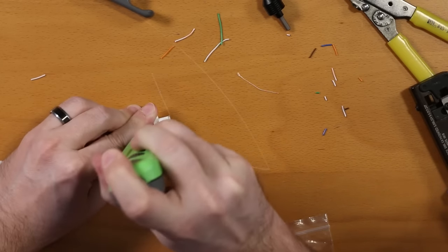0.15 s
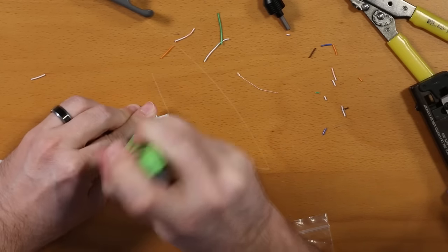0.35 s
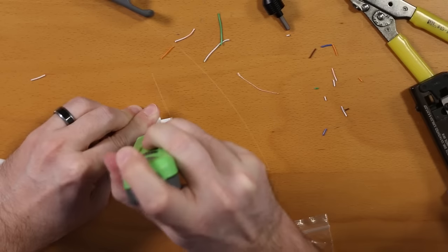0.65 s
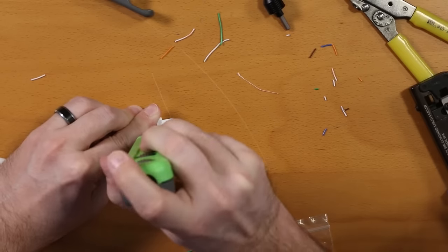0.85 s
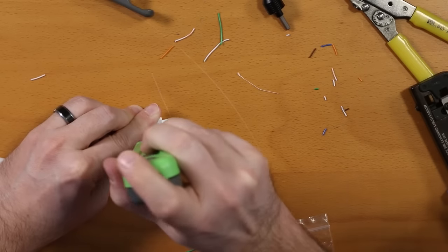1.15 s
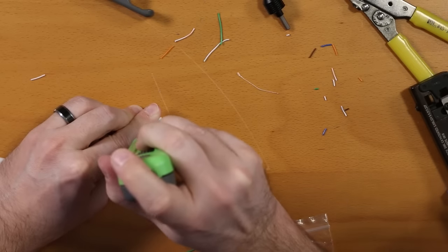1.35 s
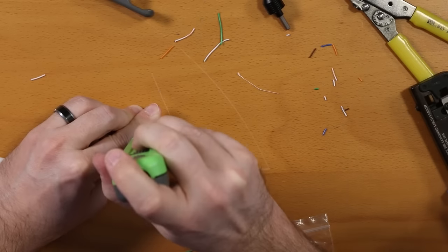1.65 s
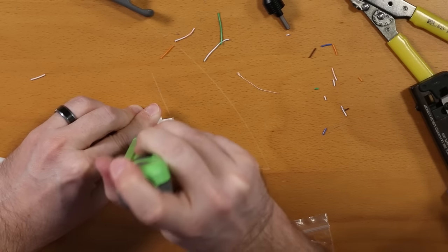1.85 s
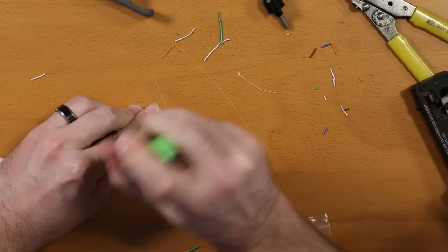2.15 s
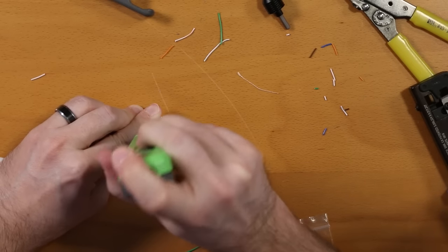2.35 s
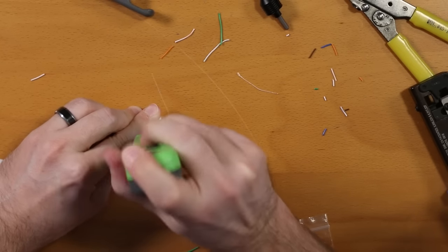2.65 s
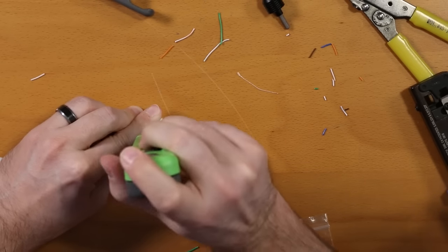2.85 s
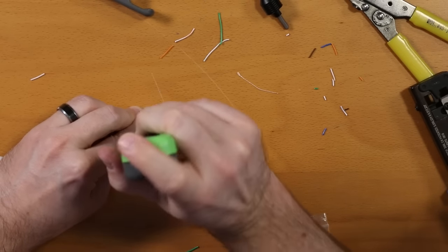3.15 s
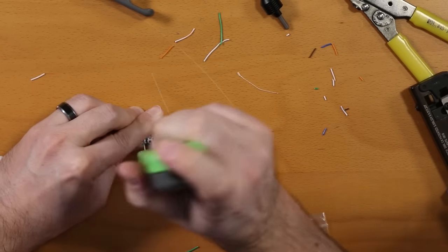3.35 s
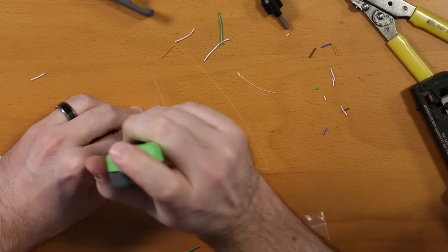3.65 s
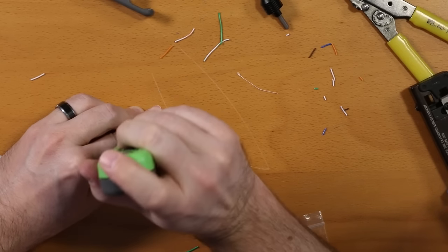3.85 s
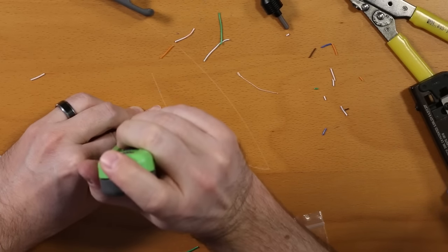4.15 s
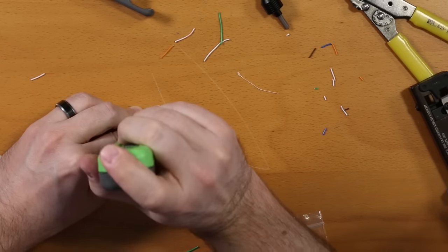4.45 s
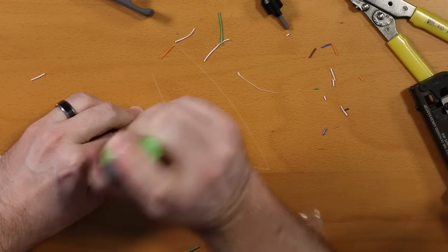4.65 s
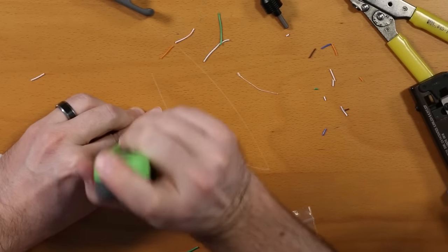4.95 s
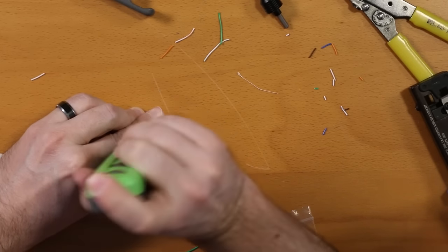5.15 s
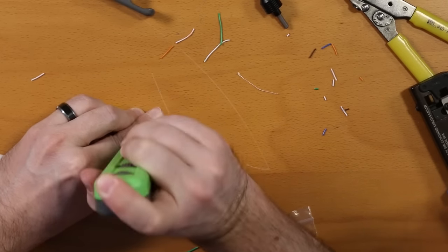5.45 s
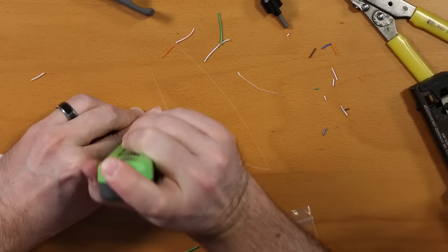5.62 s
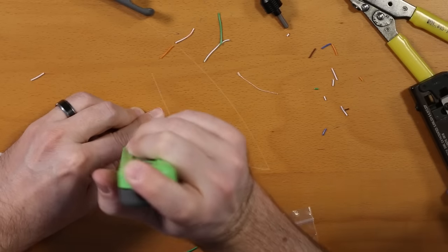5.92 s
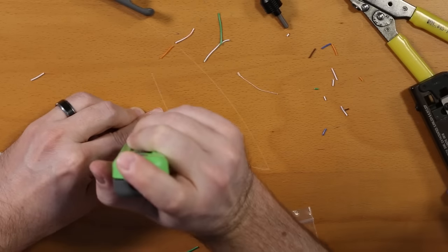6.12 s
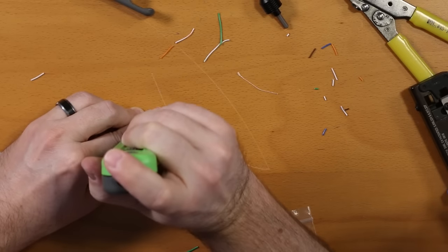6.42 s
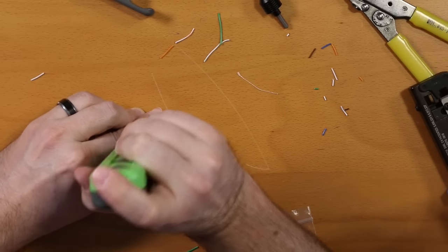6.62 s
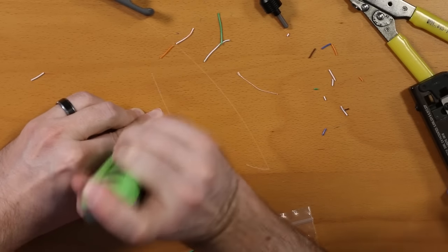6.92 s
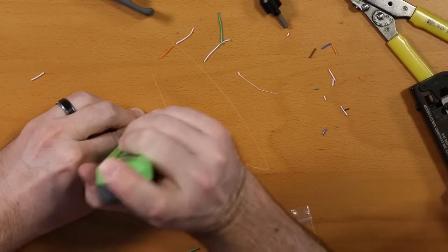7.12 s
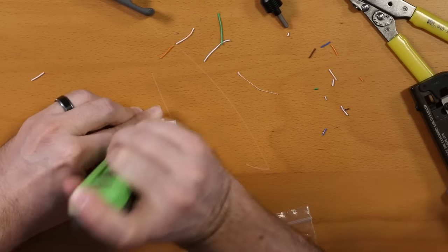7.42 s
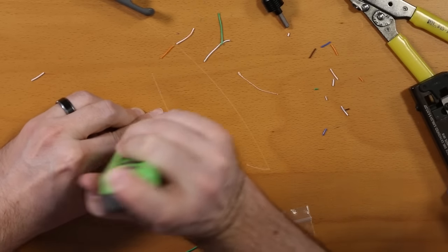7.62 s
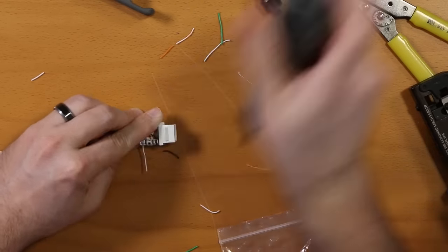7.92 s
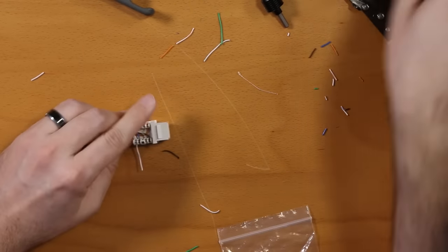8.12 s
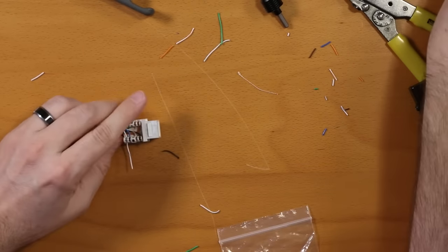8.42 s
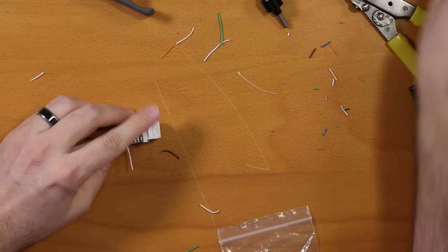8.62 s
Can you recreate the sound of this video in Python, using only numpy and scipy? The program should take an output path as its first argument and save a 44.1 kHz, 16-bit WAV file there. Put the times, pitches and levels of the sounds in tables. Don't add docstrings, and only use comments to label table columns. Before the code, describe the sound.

Faint hiss and distant ventilation lie under close handling sounds: skin scuffing wood, a blade ticking on plastic and wire. Seven explosive metallic snaps punch through, distorted at the peak, each with a bench thump, short room reverberation and a low lingering hum from the bench frame. A smaller latch click answers each one. After the last, near silence, then the tool clunks down and rocks once.

```python
import sys
import numpy as np
from scipy import signal
from scipy.fft import rfft, irfft
from scipy.io import wavfile

SR = 44100
rng = np.random.default_rng(int(sys.argv[2]) if len(sys.argv) > 2 else 0)


def linear_from_db(decibels):
    return 10 ** (np.asarray(decibels, float) / 20)


def int16_out(signal):
    q = np.round(np.clip(np.atleast_2d(signal).T, -1, 1) * 32767)
    wavfile.write(sys.argv[1], SR, q.astype(np.int16))


N = 387198


def rms_one(x):
    return x / np.sqrt(np.mean(x ** 2) + 1e-20)


def at_hz(points, hz):
    table = np.array(points)
    return np.interp(np.log(hz), np.log(table[:, 0]), table[:, 1])


def causal_colour(spectrum, size=1024):
    hz = np.maximum(np.arange(size + 1) * SR / (2 * size), 10)
    cepstrum = irfft(np.log(linear_from_db(at_hz(spectrum, hz))))
    cepstrum[1:size] *= 2
    cepstrum[size + 1:] = 0
    return rms_one(irfft(np.exp(rfft(cepstrum)))[:size]) / np.sqrt(size)


def resonance(x, hz, width_hz):
    r = np.exp(-np.pi * width_hz / SR)
    poles = [1, -2 * r * np.cos(2 * np.pi * hz / SR), r * r]
    return signal.lfilter((1 - r * r) / 2 * np.array([1, 0, -1]), poles, x)


def band(x, low_hz, high_hz):
    return signal.sosfilt(signal.butter(2, [low_hz, high_hz], "band", fs=SR, output="sos"), x)


def spread(mid, side, likeness):
    alike = np.clip(likeness, 0, 1)
    return np.sqrt(1 + alike) * mid + np.sqrt(1 - alike) * side * np.array([[1], [-1]])


def pair(likeness):
    mid, side = rng.standard_normal((2, N))
    return spread(mid, side, likeness) / np.sqrt(2)


def panned(db):
    return linear_from_db(np.array([[db / 2], [-db / 2]]))


# (frequency [Hz], level [dB per Hz])
AIR_COLOUR = [(60, -25), (95, -25.5), (125, -33), (220, -37.5), (265, -23), (350, -42), (450, -43.5),
              (560, -40.5), (800, -39.5), (1800, -48), (2600, -55), (5000, -59.5), (9000, -68),
              (15800, -71.5)]
# (frequency [Hz], width [Hz], level [dB])
DUCT_TONES = [(131, 8, -63), (262, 130, -59.5), (307, 13, -66), (447, 29, -70), (740, 130, -67.5)]


def air():
    steady_db, linger_db, linger_t60_s, swell_s = -54, -30, 0.82, 0.067
    noise = rms_one(signal.fftconvolve(pair(0.31), causal_colour(AIR_COLOUR, size=2048)[None])[:, :N])
    tones = sum(linear_from_db(db) * rms_one(resonance(pair(0.086), hz, width_hz)) for hz, width_hz, db in DUCT_TONES)
    since = np.arange(N) / SR - np.array(BLOWS)[:, :1]
    decay = linear_from_db(linger_db - 60 * np.abs(since) / linger_t60_s)
    linger = np.sum(np.clip(since / swell_s, 0, 1) * decay, axis=0)
    return panned(2.0) * ((linear_from_db(steady_db) + linger) * noise + tones)


def tremor():
    return panned(3.0) * linear_from_db(-52.5) * rms_one(band(pair(.2), 50, 90.9))


def watch():
    first_s, period_s, count = 2.882, .1945, 5
    hz, t60_s, db = 9100, .15, -76
    beats = np.full(N, 1e-18)
    beats[((first_s + period_s * np.arange(count)) * SR).astype(int)] = linear_from_db(db)
    r, w = linear_from_db(-60 / (t60_s * SR)), 2 * np.pi * hz / SR
    return signal.lfilter([0, np.sin(w)], [1, -2 * r * np.cos(w), r * r], beats)


# (frequency [Hz], level [dB], t60 [s], left-right difference [dB], first swing [+1 up, -1 down])
SWAY_MODES = [(25.86, -21, 0.88, 6, 1), (26.84, -35.5, 2.4, 2, -1), (42.7, -24, 1.2, 3, 1),
              (115, -51.5, 6, 2, 1), (264, -34, 0.6, 3.5, 1), (431, -42.5, 2, -3, -1)]
FRAME_MODES = [(58.86, -37.5, 6.6, -2, -1), (64.93, -37.5, 4.5, 3, 1), (74.07, -37, 10.4, 4, -1),
               (75.91, -38, 21.5, 4, -1), (89.7, -52, 6, 3, -1)]
# (time [s], level [dB])
JOLTS = [(-1.5271, 6), (-.3098, 0), (.1848, -4), (1.7593, 0), (2.2785, -4), (2.977, -18), (3.514, -22),
         (4.237, -19), (4.423, -16), (4.527, 0), (5.2247, 0), (6.638, 0), (7.1607, -2.5), (8.3685, -12)]


def frame():
    travel_s = .0035
    t, out = np.arange(N) / SR, np.zeros((2, N))
    for hz, db, t60, pan_db, sign in [*SWAY_MODES, *FRAME_MODES]:
        pole, swing = 2j * np.pi * hz - np.log(1000) / t60, np.zeros(N, complex)
        for s, jolt_db in JOLTS:
            at = max(round((s + travel_s) * SR), 0)
            swing[at] += linear_from_db(jolt_db) * np.exp(pole * (t[at] - s - travel_s))
        swing = signal.lfilter([1], [1, -np.exp(pole / SR)], swing)
        turn = -.9 if hz < 30 else .45 if hz < 50 else .25
        twist = turn * np.array([[-1j], [1j]])
        out += np.sign(sign) * linear_from_db(db) * panned(pan_db) * np.imag(np.exp(twist) * swing)
    return out * np.clip(t / .004, 0, 1)


# (frequency [Hz], t60 [s])
ROOM_T60 = [(150, 0.77), (500, 0.41), (1500, 0.4), (4000, 0.36), (8000, 0.35), (11000, .3), (15000, 0.18)]
# (frequency [Hz], left-right likeness [0..1])
ROOM_LIKENESS = [(150, 0.95), (300, 0.93), (700, 0.74), (2000, 0.82), (5000, 0.36), (8000, 0.97),
                 (13000, .45)]
# (frequency [Hz], left-right difference [dB])
ROOM_BALANCE = [(60, 4.5), (120, 5.5), (240, 1.5), (480, 2.5), (950, 0), (1890, 0.5), (3770, 0.5),
                (7520, 0.5), (15000, 1.5)]


def room(x, early_db, early_t60, late_db):
    t, edges, response = np.arange(SR) / SR, 90 * 2 ** np.arange(0, 8, .5), 0
    white = rng.standard_normal((2, 2, SR))
    for k, (low, high) in enumerate(zip(edges, edges[1:])):
        mid, side = band(white[k % 2], low, high)
        hz = np.sqrt(low * high)
        late = linear_from_db(late_db - 60 * t / at_hz(ROOM_T60, hz))
        early = linear_from_db(early_db - 60 * t / early_t60 * (3.0 + hz / 30000))
        field = spread(mid, side, at_hz(ROOM_LIKENESS, hz))
        response = response + (late + early) * panned(at_hz(ROOM_BALANCE, hz)) * field
    response = response * np.clip((t - .002) / 0.0051, 0, 1)
    return signal.fftconvolve(x.mean(axis=0, keepdims=True), response)[:, :N]


# (time [s],
# length [s], centre [Hz], level [dB])
SCUFFS = [(0, .12, 5200, -57), (0, .1, 2300, -56), (.69, .19, 760, -53), (.72, .13, 1600, -55),
          (1.165, .015, 2900, -62), (1.53, .09, 1100, -46), (4.40, .08, 500, -57), (4.48, .03, 3500, -63),
          (3.85, .05, 1700, -58), (6.36, .04, 1700, -55), (6.045, .1, 700, -52), (7.818, .08, 4350, -66),
          (8.695, .04, 1200, -53), (8.695, .05, 2100, -60)]


def scuffs():
    slide_s, slide_hz, slide_db = 0.03, 3000, -48
    slides = [(s - slide_s, slide_s, slide_hz, slide_db) for s, *_ in LATCHES]
    out = np.zeros((2, N))
    for s, length_s, hz, db in [*SCUFFS, *slides]:
        at = round(s * SR)
        count = min(round(length_s * SR), N - at)
        grit = rng.standard_normal((2, SR // 4)) * rng.exponential(1, SR // 4)
        rub = resonance(resonance(grit + grit[::-1] * 0.67, hz, 0.43 * hz), hz, 0.5 * hz)
        stroke = np.sin(np.linspace(0, 1, count) ** .5 * np.pi)
        out[:, at:at + count] += linear_from_db(db) * rms_one(rub)[:, :count] * stroke
    return panned(1.5) * out


# (frequency [Hz], level [dB], t60 [s])
STEEL = [(2160, -7, .045), (4600, -5, 0.023), (4970, 1, 0.023), (5120, -3.5, 0.017), (6363, -4.5, 0.016),
         (6500, -5, 0.026), (7260, -1.5, 0.023), (10200, -5, .022), (11200, -8, .015), (14220, -7, .015)]


def cracks(events, colour, rattle_s, fade_s, breadth, patchy_db, pan_db, ring_db, steel_db, level_db):
    out, body, t = np.zeros(N + 2048), causal_colour(colour), np.arange(2048) / SR
    bins, fine, coarse = np.arange(96), np.linspace(0, 95, 1025), np.linspace(0, 31, 1025)
    for (s, db, _, _, hz), draw in zip(events, rng.random((len(events), 4, 96))):
        delay_s = rattle_s * draw[0] - fade_s * np.log(np.clip(draw[1], 1e-3, 1))
        phase = np.cumsum(np.interp(fine, bins, delay_s)) * 2 * np.pi * SR / 2048
        patches = linear_from_db(patchy_db * np.interp(coarse, bins, 2 * draw[2] - 1))
        chatter = irfft(patches * np.exp(-1j * phase)) * np.sqrt(SR * (rattle_s + fade_s)) * (t < .03)
        width_hz = breadth * hz
        ring = resonance(resonance(chatter, hz, width_hz), hz, 2 * width_hz) * np.sqrt(SR / (np.pi * width_hz))
        steel = 0
        for (mode_hz, mode_db, t60), chance in zip(STEEL, draw[3]):
            decay = linear_from_db(mode_db + steel_db - 1.3 * patchy_db * chance - 60 * t / t60)
            steel = steel + decay * np.sin(2 * np.pi * mode_hz * t)
        at = round((s - 6e-4) * SR)
        burst = np.convolve(chatter, body)[:2048] + linear_from_db(ring_db) * ring + steel
        out[at:at + 2048] += linear_from_db(db + level_db) * burst
    return panned(pan_db) * np.array([0.54 * out + 0.66 * np.roll(out, 1), out])[:, :N]


def thumps(events, modes, contact_s, lead_s, spread_db, level_db):
    at = np.array([round((event[0] - lead_s) * SR) for event in events])
    click_db, over_db, deep_db = np.array([event[1:4] for event in events]).T
    chance, out = rng.standard_normal((len(events), len(modes))), np.zeros((2, 2, N))
    for k, (hz, db, t60) in enumerate(modes):
        push = np.full(N, 1e-18)
        thump_db = deep_db + 3 if hz < 190 else over_db
        late = round(.65 / hz * SR)
        push[at + late] = -linear_from_db(click_db + thump_db + db + level_db + spread_db * chance[:, k])
        r, w = linear_from_db(-60 / (t60 * SR)), 2 * np.pi * hz / SR
        poles = [1, -2 * r * np.cos(w), r * r]
        sine = signal.lfilter([0, r * np.sin(w)], poles, push)
        cosine = signal.lfilter([1, -r * np.cos(w)], poles, push)
        twist = min(140 / hz, .6) * np.cos(2.9 * k + .3)
        side_db = at_hz(ROOM_BALANCE, hz) + 1.2 * np.cos(0.92 * k)
        out[int(hz < 50)] += panned(side_db) * (np.cos(twist) * sine + np.sin(twist) * cosine * [[1], [-1]])
    free = signal.butter(2, 95, "high", fs=SR, output="sos")
    out = signal.sosfilt(free, out[0]) + out[1]
    soft = np.exp(-1 / (contact_s * SR))
    return signal.lfilter([(1 - soft) ** 2], [1, -2 * soft, soft * soft], out)


def knocks(events, low_hz, high_hz, level_db):
    push = np.full(N, 1e-18)
    for s, click_db, thump_db, *_ in events:
        push[round(s * SR)] = linear_from_db(click_db + thump_db)
    return linear_from_db(level_db) * band(push, low_hz, high_hz)[None]


def ringing_at(hz, events):
    return [(*event, hz) for event in events]


# (time [s], click [dB], thump over click [dB], deep thump over click [dB])
NUDGES = [(1.6683, -49, 10, 5), (3.5934, -50.5, 17, 9.5), (4.02, -56, 9.5, 3), (4.4, -60.5, 7.5, -2.5),
          (4.4227, -52, 15, 23), (6.0512, -49, 16.5, -3), (6.14, -61, 12.5, -2),
          (6.5193, -53.5, 14.5, -5.5), (7.0908, -43.5, 10, 8)]
# (frequency [Hz], level [dB per Hz])
NUDGE_COLOUR = [(400, -11.5), (1000, -2.5), (2100, -0.5), (3500, -10.5), (6000, -25), (15800, -45)]


def jack_nudges():
    return cracks(ringing_at(1600, NUDGES), NUDGE_COLOUR, rattle_s=0.00067, fade_s=0.0012, breadth=0.25,
                  patchy_db=6, pan_db=3.5, ring_db=-6.5, steel_db=-37, level_db=-7.0)


# (time [s], click [dB], thump over click [dB], deep thump over click [dB], ring [Hz])
SEATINGS = [(1.5254, -40.5, 19, -20.5, 5850), (1.5359, -28, -0.5, -17.5, 5500),
            (1.538, -36, -12, -18.5, 11460), (1.5576, -38.5, 12, -18, 5830), (2.142, -26.5, 1, 0.5, 3200),
            (3.5115, -33.5, 2.5, -2, 5390), (3.5135, -43, 1, -6, 13980), (3.8525, -41.5, -6, -13, 5800),
            (3.8605, -39.5, -4, -16, 12800), (4.2405, -37.5, -2, 4, 3320), (4.244, -39, -7.5, -9, 5590),
            (4.874, -28.5, 4.5, 1.5, 3320), (6.109, -41.5, 2.5, 3.5, 10030),
            (6.1115, -52.5, -1, -7.5, 13770), (6.363, -37, 2.5, -1, 3610), (6.367, -42, -8, -4, 1896),
            (7.003, -33, 0, 3, 3340)]
BRUSHES = [(.043, -30, 0, -2, 2150), (.5805, -47, 3, -7, 3400), (.685, -41, 7, -8, 6600),
           (1.221, -38, 7, 1, 2200), (1.2236, -41, -5, -5, 5800), (1.2921, -39, -7, -6, 9700),
           (1.2941, -44, -7, -7, 14000), (1.3281, -43, 3, -13, 2100), (1.3981, -55, -8, -10, 5000),
           (1.9777, -37, 8, -12, 2100), (2.9301, -53, -10, -1, 3500), (2.9771, -36, 6, -4, 5400),
           (2.9791, -42, -5, -5, 9500), (3.5311, -44, -1, 0, 2200), (3.5961, -49, -5, -5, 4900),
           (3.9915, -46, 0, -7, 4600), (4.074, -51, -13, -20, 4600), (4.987, -44, 8, -13, 2200),
           (6.0951, -55, -8, -8, 4800), (6.1301, -49, 9, -6, 9500), (6.1331, -50, -5, -5, 4900),
           (7.1241, -38, 6, 1, 5300), (7.7714, -52, -1, -8, 7500), (7.8211, -51, 12, -17, 4300),
           (7.8221, -53, -5, -10, 11000)]
# (frequency [Hz], level [dB per Hz])
TICK_COLOUR = [(400, -19), (800, -7.5), (1500, -10), (2100, -2.5), (2700, -10.5), (3500, -6), (6000, -10),
               (10000, -16.5), (15800, -25.5)]


def blade_ticks():
    out = 0
    for events, ring_db in ((SEATINGS, -7.5), (BRUSHES, -4.5)):
        out = out + cracks(events, TICK_COLOUR, rattle_s=0.001, fade_s=0.00098, breadth=0.14,
                           patchy_db=6, pan_db=3.5, ring_db=ring_db, steel_db=-18.5, level_db=-6.0)
    return out


# (time [s], click [dB], thump over click [dB], deep thump over click [dB])
LATCHES = [(0.4134, -17.5, -4, -11), (1.9999, -17, -3.5, -18), (2.4735, -17.5, -6.5, -19.5),
           (4.7475, -16.5, 1.5, -14.5), (5.4592, -16.5, 2, -30), (6.84, -18, -1.5, -12.5),
           (7.3797, -18.5, 0.5, -13.5)]
# (frequency [Hz], level [dB per Hz])
CLICK_COLOUR = [(350, -18.5), (600, -8), (811, -23.5), (1140, -16), (2140, -8), (2560, -22.5),
                (2980, -11.5), (4200, -12.5), (5150, -16.5), (5750, -21), (12200, -17.5), (13300, -23),
                (15800, -29)]


def latch_clicks():
    return cracks(ringing_at(5100, LATCHES), CLICK_COLOUR, rattle_s=0.003, fade_s=0.001, breadth=0.27,
                  patchy_db=2, pan_db=3, ring_db=0, steel_db=-2.5, level_db=-8.5)


# (frequency [Hz], level [dB], t60 [s])
TAPPED = [(44, -16.5, .2), (98, -9.5, 0.21), (142, 1, 0.31), (240, -8.5, 0.11), (330, -7, 0.27),
          (331.5, 3, 0.046), (442.3, 1.5, 0.11), (443, -11, 0.32), (563, 1, 0.066), (990, -8, 0.046)]


def tapped_bench():
    touches = [event[:4] for event in [*LATCHES, *SEATINGS, *BRUSHES, *NUDGES]]
    thump = thumps(touches, TAPPED, contact_s=0.00049, lead_s=0.0028, spread_db=2.5, level_db=-1.5)
    return thump, knocks(touches, 260, 820, level_db=-2.5)


# (time [s], click [dB], thump over click [dB], deep thump over click [dB])
LAID_DOWN = [
    (8.3645, -29.5, -8.5, 2),
    (8.3685, -23, 12.5, 7),
]
# (frequency [Hz], level [dB per Hz])
LAID_COLOUR = [(290, -26.5), (500, -4.5), (630, -24), (931, -21), (1440, -22), (1590, -27), (1710, -23),
               (1840, -23.5), (7800, -29.5), (12500, -45), (15800, -50.5)]


def laid_clicks():
    return cracks(ringing_at(12500, LAID_DOWN), LAID_COLOUR, rattle_s=0.0027, fade_s=.003, breadth=0.17,
                  patchy_db=2, pan_db=3, ring_db=-15, steel_db=-20, level_db=-2.5)


# (frequency [Hz], level [dB], t60 [s])
LAID_MODES = [(137.5, -2, 0.58), (214, -8.5, 0.25), (293, -8, 0.51), (357, -6, .3), (359, -12, 0.31),
              (427, 7, 0.15), (461, -11.5, 0.79), (477, -5.5, 0.48), (540, -21, .25), (730, -14, 0.28),
              (754, -29, .25), (930, -15, 0.16), (1200, -7, 0.09)]


def laid_bench():
    thump = thumps(LAID_DOWN, LAID_MODES, contact_s=1e-4, lead_s=0.001, spread_db=0.0, level_db=-8.0)
    return thump, knocks(LAID_DOWN, 210, 1010, level_db=3.5)


# (time [s], crack [dB], thump over crack [dB], deep thump over crack [dB], ring [Hz])
BLOWS = [(0.1843, 0.5, -8, -17, 7300), (1.76, 0.5, -6.5, -12.5, 4190), (2.2792, 1, -6.5, -18, 4125),
         (4.524, -3, -2.5, -18, 7316), (5.2241, 0.5, -5, -19, 3880), (6.6367, -0.5, -4, -21, 7490),
         (7.16, 0, -6.5, -21.5, 7100)]
# (frequency [Hz], level [dB per Hz])
SNAP_COLOUR = [(530, -27), (900, -2), (967, -3.5), (1040, -5), (1800, -7), (2180, -3), (2620, -8),
               (3840, -2.5), (8190, -4.5), (12000, -9.5), (14000, -14.5), (15800, -17.5)]


def hammer_cracks():
    return cracks(BLOWS, SNAP_COLOUR, rattle_s=.003, fade_s=.0017, breadth=0.2,
                  patchy_db=.6, pan_db=1.8, ring_db=-11.5, steel_db=-19.5, level_db=-0.5)


# (frequency [Hz], level [dB], t60 [s])
BENCH = [(33, -15, 0.33), (42.7, -14.5, .2), (104, -9, 0.27), (139.4, 3.5, .33), (236.5, -12.5, 0.068),
         (256, -11.5, 0.14), (289.5, -7, .25), (304.4, -3.5, 0.33), (338.4, -7.5, .26), (409, -8, 0.088),
         (451, -3, .2), (480, 4, 0.009), (537, -12, 0.072), (641, -10, 0.26), (708, -10.5, 0.19),
         (810, -19.5, 0.14), (1025, -19, 0.14)]
# (frequency [Hz], level [dB], t60 [s])
BENCH_ACROSS = [(33, -14.5, .3), (42.46, -10.5, .2), (99.8, -10.5, .15), (141.1, 3, .35), (168, -10, 0.16),
                (261, -10, .2), (292.5, -5, .25), (309.7, -1.5, .25), (353.7, -10, 0.14), (423, -5.5, 0.13),
                (445, -6.5, 0.24), (486, 2.5, 0.014), (547, -13, .2), (642, -14, 0.29), (817, -17.5, 0.27),
                (990, -20, 0.17)]


def struck_bench():
    thump = 0
    for events, modes in ((BLOWS[:3], BENCH), (BLOWS[3:], BENCH_ACROSS)):
        thump = thump + thumps(events, modes, contact_s=0.00019, lead_s=.0026, spread_db=2.5, level_db=1.0)
    return thump, knocks(BLOWS, 250, 480, level_db=8.5)


def scene():
    crack = hammer_cracks()
    small = latch_clicks() + blade_ticks() + jack_nudges()
    laid = laid_clicks()
    thump, knock = (sum(parts) for parts in zip(struck_bench(), tapped_bench(), laid_bench()))
    radiated = crack + linear_from_db(-1.0) * small + linear_from_db(7.5) * laid
    wet = room(radiated, early_db=-36.5, early_t60=0.22, late_db=-37.5)
    wet += room(knock, early_db=-1.0, early_t60=0.67, late_db=-7.0)
    return crack + small + laid + thump + wet + scuffs() + watch() + frame() + tremor() + air()


def band_limit(x):
    return signal.sosfilt(signal.butter(12, 15990, fs=SR, output="sos"), x)


def record(dry):
    hiss = linear_from_db(-77) * rng.standard_normal(dry.shape)
    clipped = np.clip(dry + hiss, -.99, .99)
    top_cut = signal.cheby2(10, 30, 16150, fs=SR, output="sos")
    mix = signal.sosfilt(top_cut, clipped)
    return band_limit(mix)


dry = scene()
out = record(dry)
int16_out(out)
```